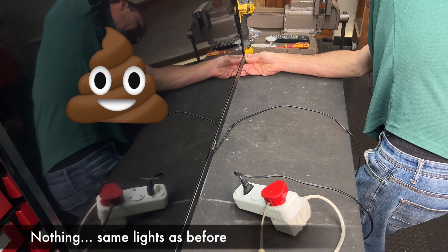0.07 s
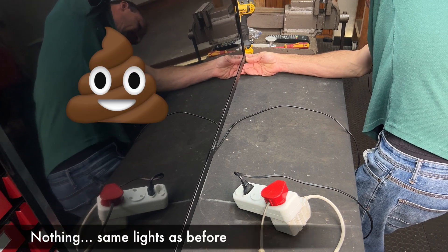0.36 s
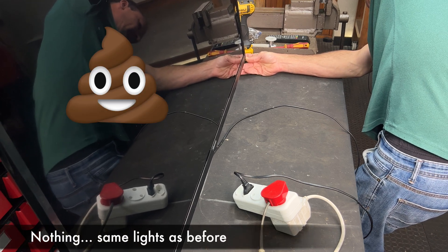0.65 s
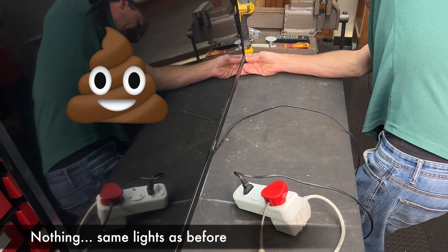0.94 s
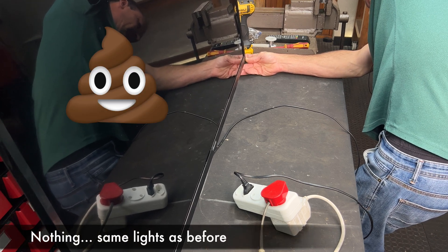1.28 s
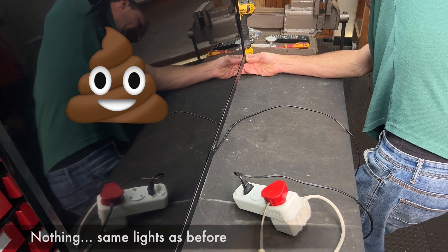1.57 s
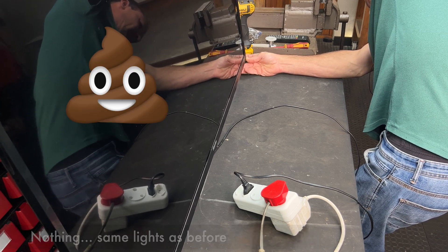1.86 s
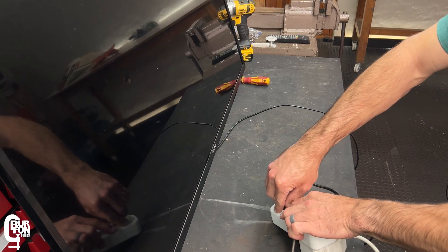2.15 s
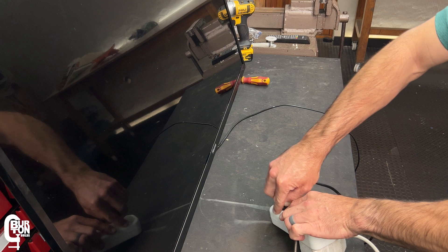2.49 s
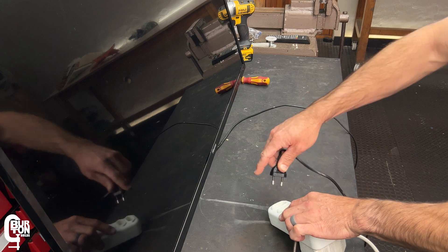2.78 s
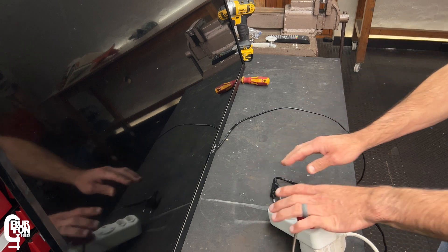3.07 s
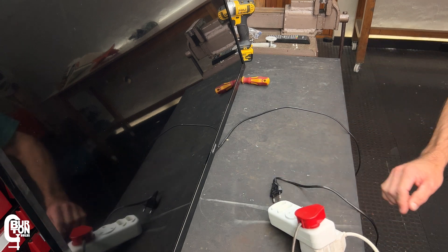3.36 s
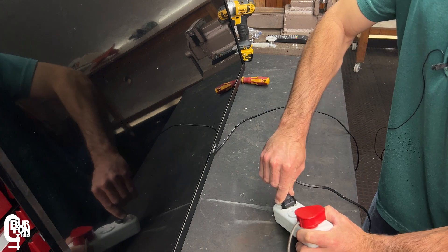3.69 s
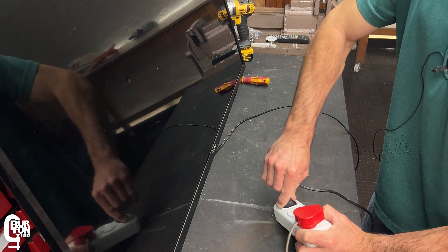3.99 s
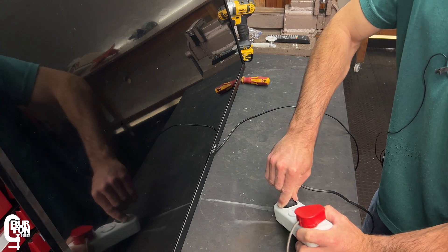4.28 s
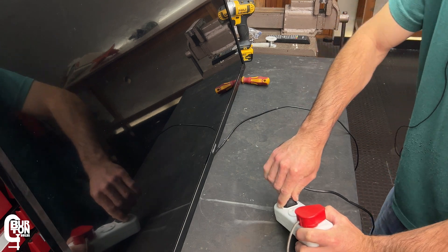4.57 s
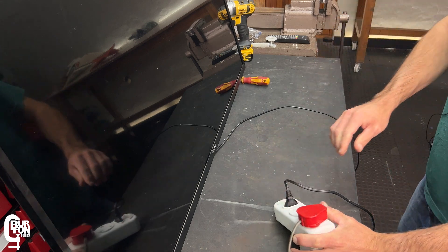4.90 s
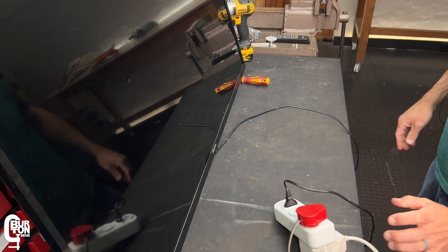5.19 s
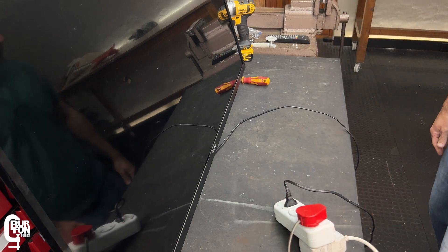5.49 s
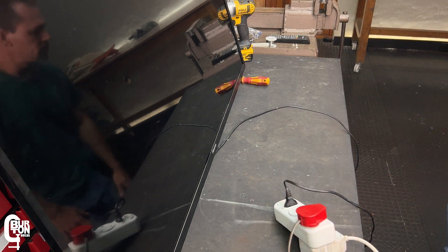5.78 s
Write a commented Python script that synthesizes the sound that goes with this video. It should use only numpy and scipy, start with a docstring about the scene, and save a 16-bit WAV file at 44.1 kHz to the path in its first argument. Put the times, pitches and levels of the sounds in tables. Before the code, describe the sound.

A plug snaps out of a plastic power strip, clacks onto a bench and snaps back in, amid soft knocks and rustling.

```python
"""Power strip on a workbench

In a small, quiet workshop a plug snaps out of a plastic power strip, clacks down on the bench and snaps
home again. Each snap is a quick volley of contacts that rings the housing and jolts the bench top.
Fingers tick on the plastic, hands knock softly and brush along, clothes rustle, and a faint hum sits
in the room's rumble."""
import sys
import numpy as np
from scipy import signal
from scipy.fft import rfft, irfft, next_fast_len
from scipy.io import wavfile

SR = 44100
rng = np.random.default_rng(int(sys.argv[2]) if len(sys.argv) > 2 else 0)


def dump_mix(stems):
    """Bounce the given channels to the path in sys.argv[1] as a 16-bit WAV at rate SR."""
    frames = np.atleast_2d(stems).T  # one column per channel
    limited = np.clip(frames, -1, 1)  # hard clip at full scale
    pcm = np.round(limited * 32767).astype(np.int16)
    wavfile.write(sys.argv[1], SR, pcm)


N = 266758
TIME = np.arange(N) / SR
# light touches on the plastic: start_s, relative_db, brightness_hz
TICKS = [(.045, -53, 6300), (.845, -56, 7900), (1.291, -55.5, 4240), (1.988, -49, 9100),
         (2.0178, -43, 2820), (2.195, -33, 1675), (2.2253, -39.5, 1477), (2.3167, -36.5, 2100),
         (2.4478, -31, 2271), (2.4711, -35, 1800), (2.8039, -47, 3310), (2.871, -49, 6540),
         (2.9878, -37, 1900), (3.3385, -38.5, 7200), (3.5622, -41, 1590), (3.6218, -41, 2000),
         (3.7337, -52.5, 2113), (3.7834, -36.5, 1660), (3.799, -48.5, 4570), (4.5101, -34, 3100),
         (4.7665, -42.5, 2824), (4.8896, -40.5, 5730), (5.3939, -39.5, 2680), (5.4365, -42.5, 5050),
         (5.473, -44, 1690), (5.8212, -31.5, 1750), (5.837, -38.5, 1790)]


def from_db(db):
    return 10 ** (np.asarray(db) / 20)


def rms_one(x):
    return x / np.sqrt(np.mean(x ** 2) + 1e-20)


def energy_one(x):
    return x / np.sqrt(np.sum(x ** 2) + 1e-20)


def at_hz(points, hz):
    """Read a table on a log-frequency axis."""
    freqs, values = np.transpose(points)
    return np.interp(np.log(np.maximum(hz, 1)), np.log(freqs), values)


def decay(t60, size):
    return np.exp(-np.log(1000) * TIME[:size] / t60)


def butter(x, hz, kind, order):
    return signal.sosfilt(signal.butter(order, np.clip(hz, 10, .45 * SR), kind, fs=SR, output="sos"), x)


def noise(spectrum, size=N):
    """Noise of a given colour, rms 1."""
    padded = next_fast_len(size)
    colour = from_db(at_hz(spectrum, np.fft.rfftfreq(padded, 1 / SR)))
    return rms_one(irfft(rfft(rng.standard_normal(padded)) * colour, padded)[:size])


def add(track, start_s, sound):
    start = round(start_s * SR)
    track[start:start + len(sound)] += sound[:max(N - start, 0)]


def struck(modes, size, uneven_db):
    """Decaying modes of alternating sign; every blow weights them a little differently."""
    out = 0
    for k, (hz, db, t60) in enumerate(modes):
        gain = (-1) ** k * from_db(db + uneven_db * rng.standard_normal())
        out += gain * decay(t60, size) * np.sin(2 * np.pi * hz * TIME[:size])
    return out


def room_tone():
    """A bed of low rumble, hiss and faint steady hum."""
    # still air and microphone hiss: freq_hz, density_db
    floor = [(25, -16), (45, 4), (70, 27.5), (110, 25.5), (200, 17.5), (300, 12.5), (450, 8.5), (650, 2.5),
             (1200, 0), (2200, -3), (4000, 2), (9000, 1.5), (16000, -2)]
    # hum partials: pitch_hz, rms_db
    partials = [(80, -68), (120, -72.5), (200, -75.5), (240, -76), (2094, -87.5), (4091, -87.5)]
    hum = sum(from_db(db) * np.sqrt(2) * np.sin(2 * np.pi * (hz * TIME + rng.random()))
              for hz, db in partials)
    return from_db(-62) * noise(floor) + hum


def friction(colour, grain_db):
    """Rubbing catches and lets go, so its hiss is finely uneven."""
    catches = rms_one(butter(rng.standard_normal(N), 160, "low", order=2))
    return rms_one(noise(colour) * from_db(grain_db * catches))


def strokes(rows, rise_share=.43, edge_fade_db=12):
    """Envelope of sliding strokes: each swells to its peak and fades more slowly."""
    power = 0
    for peak_s, db, length_s in rows:
        progress = (TIME - peak_s) / length_s
        from_peak = np.maximum(-progress / rise_share, progress / (1 - rise_share))
        power += from_db(db - edge_fade_db * from_peak) ** 2
    return np.sqrt(power)


def scrapes(wander_hz, wander_db):
    """As a hand slides on, each resonance swells and sinks on its own."""
    # resonances stirred by rubbing: centre_hz, width_hz, relative_db
    resonances = [(1240, 120, -15.5), (2180, 130, -11.5), (3150, 150, -14.5)]
    out = 0
    for hz, width_hz, db in resonances:
        band = rms_one(signal.lfilter(*signal.iirpeak(hz, hz / width_hz, fs=SR), rng.standard_normal(N)))
        grip = rms_one(butter(rng.standard_normal(N), wander_hz, "low", order=2))
        out += band * from_db(db + wander_db * grip)
    return out


def movement():
    """Hands brush, cloth slides, and the body rumbles along with the arms."""
    # rustle of the moving arms: time_s, level_db
    activity = [(0, -81), (1.96, -78.5), (2.0, -61.5), (2.75, -65.5), (3.2, -58.5), (3.85, -71),
                (4.45, -68), (4.58, -60), (5.3, -58.5), (6.05, -66.5)]
    # a hand slides over strip or bench: peak_s, level_db, length_s
    brushes = [(1.62, -66.5, 0.18), (2.35, -54, 0.17), (3.16, -50.5, 0.27), (4.27, -66.5, .15),
               (5.45, -55, .15), (5.87, -52.5, 0.34)]
    # the shirt slides: peak_s, level_db, length_s
    swishes = [(1.62, -71, .1), (2.34, -64, 0.11), (4.84, -60.5, .17), (5.42, -57, .13), (5.58, -60, 0.27),
               (5.84, -51, .12), (6.02, -49.5, 0.4)]
    # rubbing hands: freq_hz, density_db
    hand_colour = [(120, 1.5), (350, 9), (700, 3), (1250, 3.5), (1850, -0.5), (2200, 3), (2700, -1.5),
                   (3200, 3.5), (3900, -1), (4800, -2.5), (8000, -11.5), (16000, -26.5)]
    # airy cloth hiss: freq_hz, density_db
    cloth_colour = [(1500, -16), (3500, -7), (6000, 1.5), (9500, 1.5), (12500, -2.5), (16000, -11)]
    # low body movement: freq_hz, density_db
    body_colour = [(40, -25.5), (70, -5), (200, 3.5), (300, -6), (500, -12.5), (900, -31.5)]
    arms_db = np.interp(TIME, *np.transpose(activity))
    effort = np.hypot(from_db(arms_db), strokes(brushes))
    rubbing = from_db(-.96) * friction(hand_colour, grain_db=2) + scrapes(wander_hz=11, wander_db=4)
    cloth = strokes(swishes) * friction(cloth_colour, grain_db=1.76)
    rumble_db = -57 + .57 * (arms_db + 60)  # follows a little over half of the arms' swing
    rumble = from_db(rumble_db) * friction(body_colour, grain_db=2)
    return effort * rubbing + cloth + rumble


def contact(low_hz, high_hz, peak_hz, crack_t60_s):
    """A hit on plastic: click, dense crack and housing ring up close, and the click alone for the room."""
    # dense vibration of the plastic: freq_hz, density_db
    crack_colour = [(200, -4), (460, 1.5), (780, -9), (1200, -0.5), (2000, 0), (3300, -1), (4500, -3),
                    (6000, -3.5), (8500, -3.5), (11000, -7.5), (16000, -6.5)]
    # housing modes: pitch_hz, relative_db, t60_s
    housing = [(1160, 2, .04), (1350, -6.5, 0.0046), (1930, -2, 0.015), (1980, -6, 0.072),
               (2420, -7, 0.035), (2920, 3.5, 0.042), (3180, 1, 0.058), (3400, 1, 0.049), (3904, 3, 0.039),
               (4790, -6, 0.089), (4940, -4.5, .035), (6010, 0.5, 0.037), (7050, -1.5, 0.05),
               (7950, -4, .02), (8800, -3, 0.034), (8955, -5, .025)]
    size = SR // 8
    click = signal.unit_impulse(size)
    crack = energy_one(noise(crack_colour, size) * decay(crack_t60_s, size))
    ring = energy_one(struck(housing, size, uneven_db=3))
    sounds = np.array([crack + from_db(-10) * click + from_db(-10.5) * ring, click])
    # the struck spot favours one region of the housing's resonances
    sounds += from_db(1.5) * signal.lfilter(*signal.iirpeak(peak_hz, Q=4, fs=SR), sounds)
    # a harder contact reaches higher, a lighter one has less body
    sounds = butter(butter(sounds, low_hz, "high", order=1), high_hz, "low", order=2)
    return [from_db(19.5) * energy_one(sound) for sound in sounds]


def finger_ticks(send_db=-9.5):
    """Light touches on the housing, each in a band around its brightness."""
    return [(s, db, send_db, contact(.34 * hz, 1.8 * hz, hz, crack_t60_s=.018)) for s, db, hz in TICKS]


def bench_knocks(fingertip_below_hz=2640, hollow_hz=442):
    """Each blow drives the bench modes near the speed of its push; a resting hand cuts the ring short."""
    # bench top modes: pitch_hz, relative_db, free_t60_s
    modes = [(62, -12, 0.75), (71, -1.5, 0.36), (98.3, 1.5, 0.25), (135.4, -2.5, 0.13), (174, -5.5, 0.42),
             (209.7, -5, 0.13), (253, 1, 0.067), (340, -7, 0.26), (381.6, -1, .13), (483.5, 0.5, 0.054),
             (661, -9.5, 0.11)]
    # hands and plug bump the top: start_s, relative_db, push_hz
    bumps = [(.046, -52.5, 563), (.22, -41, 105), (.285, -44, 111), (1.085, -48, 95), (1.28, -43, 105),
             (1.608, -41.5, 140), (1.651, -37, 94), (2.243, -48, 95), (2.8959, -23.5, 452),
             (2.909, -29.5, 250), (3.147, -32, 225), (3.563, -45.5, 380), (3.569, -38.5, 94.5),
             (3.791, -35, 89), (4.948, -31.5, 280.7), (4.956, -33.5, 120), (5.238, -44, 320),
             (5.468, -41, 251), (5.779, -37, 277), (5.822, -32.5, 300), (5.858, -40, 290)]
    # each snap jolts the whole strip: start_s, relative_db
    jolts = [(2.478, -25), (3.933, -15)]
    # the shell slaps the bench, then the strip's weight sets the top swinging
    slaps = [(s, db, 380, .2) for s, db in jolts]
    thumps = [(s + .012, db + 1.5, 90, .85) for s, db in jolts]
    # dull touches come from a fingertip and also sound the hollow shell
    taps = [(s, db - 15, hollow_hz) for s, db, hz in TICKS if hz < fingertip_below_hz]
    # the quicker the push, the sooner the hand stills the bench
    damped = [(s, db, hz, .21 * (160 / hz) ** .6) for s, db, hz in bumps + taps]
    out, size = np.zeros(N), SR // 2
    for start_s, db, push_hz, damping_t60_s in slaps + thumps + damped:
        ring = struck(modes, size, uneven_db=2.84) * decay(damping_t60_s, size)
        ring = butter(butter(ring, .72 * push_hz, "low", order=2), .65 * push_hz, "high", order=2)
        add(out, start_s, from_db(db + 23.5) * energy_one(ring))
    return out


def after_rings():
    """Small parts ring on after a blow, leaving thin tones under its tail."""
    # a hollow tap, then the springs: start_s, pitch_hz, level_db, t60_s
    rings = [(.044, 1080, -53, .04), (.046, 668, -54.5, .3), (2.479, 5319, -55.5, .85),
             (3.933, 5459, -53.5, .85)]
    out = np.zeros(N)
    for start_s, hz, db, t60 in rings:
        add(out, start_s, from_db(db) * decay(t60, size=SR) * np.sin(2 * np.pi * hz * TIME[:SR]))
    return out


def plug_snaps():
    """Pins and rim catch in the socket: one volley on the way out, one on the way in."""
    # catches: start_s, relative_db, low_hz, high_hz, peak_hz, crack_t60_s, send_db
    snaps = [(2.4759, -10, 1700, 4000, 3630, .023, -14), (2.4786, -.5, 1600, 12000, 3448, .016, -12.5),
             (2.484, -9.5, 2000, 7000, 4050, .04, -7), (2.487, -2, 2698, 13500, 9180, .02, -12.5),
             (2.4945, -15.5, 2398, 10510, 4830, .017, -10), (3.9326, 2.5, 950, 11530, 1290, .019, -8),
             (3.9452, -7.5, 1700, 12010, 6000, .012, -14), (3.9493, -6.5, 1804, 8200, 6800, 0.02, -14)]
    return [(s, db, send_db, contact(*timbre)) for s, db, *timbre, send_db in snaps]


def plug_clacks(send_db=-14.5):
    """The loose plug lands on the bench, tips over and settles."""
    # landings: start_s, relative_db, low_hz, high_hz, peak_hz
    clacks = [(2.8965, -16.5, 548, 3800, 3430), (2.9097, -10, 904, 5900, 2104),
              (2.9146, -20.5, 500, 5000, 1090)]
    return [(s, db, send_db, contact(*timbre, crack_t60_s=.0098)) for s, db, *timbre in clacks]


def workshop_reverb(send, build_s):
    """Diffuse reflections build up within milliseconds and die sooner in the treble."""
    # tone of the reflections: freq_hz, density_db
    colour = [(100, -1.5), (400, -4.5), (800, 0.5), (1300, -3), (2200, -2), (3500, -1), (6000, -1.5),
              (11000, -0.5), (16000, -4.5)]
    # their decay: freq_hz, t60_s
    decay_times = [(100, 0.57), (500, 0.38), (1500, 0.36), (4000, .3), (9000, 0.205), (16000, 0.19)]
    size = SR * 2 // 3
    rest, tail = noise(colour, size), 0
    for edge_hz in (250, 700, 2500, 6000, 11000, 19000):
        band = signal.sosfiltfilt(signal.butter(2, edge_hz, fs=SR, output="sos"), rest)
        rest = rest - band
        tail += band * decay(at_hz(decay_times, edge_hz / np.sqrt(2)), size)
    build_up = 1 - np.exp(-(TIME[:size] / build_s) ** 2)
    return signal.fftconvolve(send, energy_one(tail * build_up))[:N]


def scene():
    """Mono mix: plastic hits and bench knocks feed the room; the other layers stay dry."""
    plastic, plastic_send = np.zeros((2, N))
    for start_s, db, send_db, (near, far) in plug_snaps() + plug_clacks() + finger_ticks():
        add(plastic, start_s, from_db(db) * near)
        add(plastic_send, start_s, from_db(db + send_db) * far)
    knocks = bench_knocks()
    room = workshop_reverb(from_db(-6.5) * plastic_send + from_db(-13) * knocks, build_s=.0048)
    return (plastic + knocks + after_rings() + room + movement() + room_tone())[None]


def record(dry):
    """The loudest snaps overload softly; a few narrow dips and a steep top cut shape the sound."""
    # dips in the response: centre_hz, width_hz, depth_db
    notches = [(730, 170, -3.5), (1582, 250, -20.5), (2596, 547, -19.5)]
    ceiling, cutoff_hz = 1.15, 15900
    out = dry / (1 + (dry / ceiling) ** 4) ** (1 / 4)
    for hz, width_hz, depth_db in notches:
        dipped = signal.lfilter(*signal.iirnotch(hz, hz / width_hz, fs=SR), out)
        out = dipped + from_db(depth_db) * (out - dipped)
    return signal.sosfilt(signal.ellip(12, .1, 70, cutoff_hz, fs=SR, output="sos"), out)


dry = scene()
out = record(dry)
dump_mix(out)
```